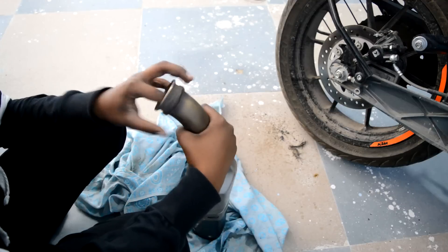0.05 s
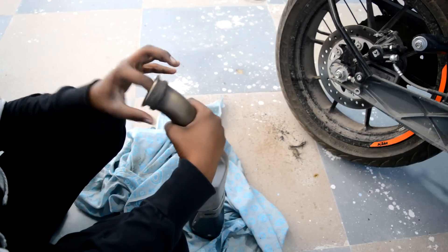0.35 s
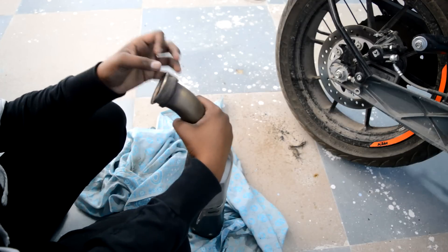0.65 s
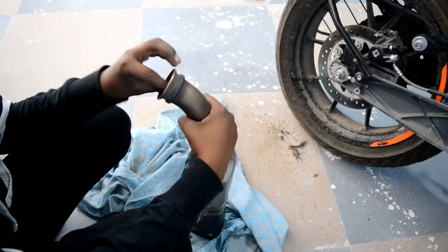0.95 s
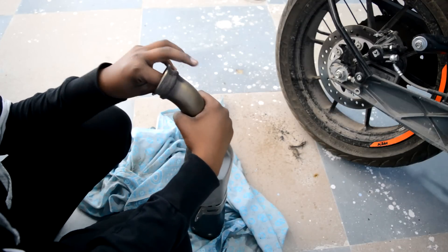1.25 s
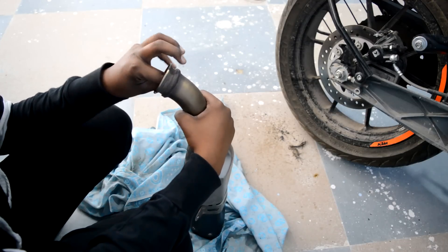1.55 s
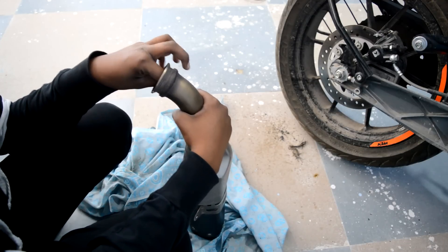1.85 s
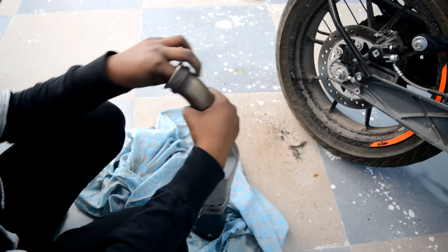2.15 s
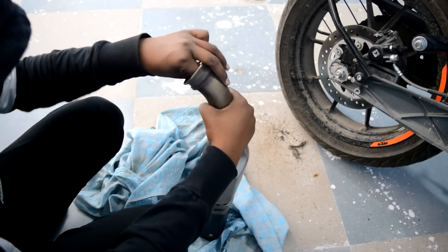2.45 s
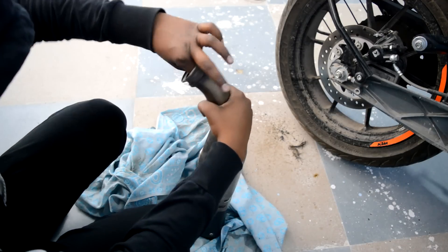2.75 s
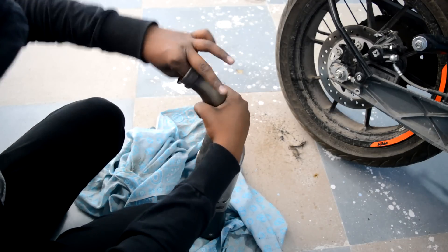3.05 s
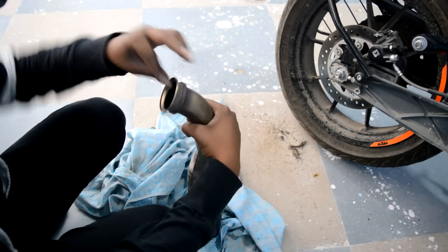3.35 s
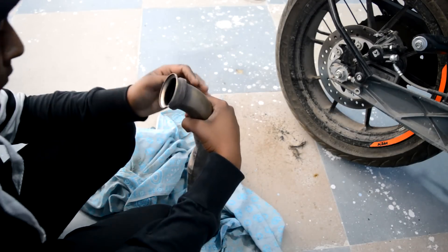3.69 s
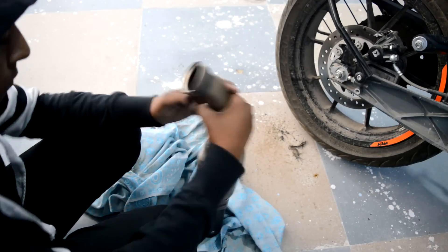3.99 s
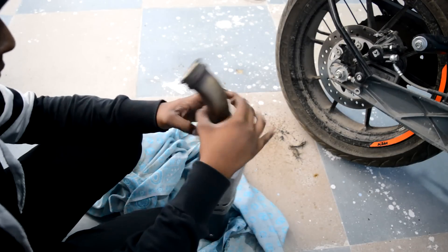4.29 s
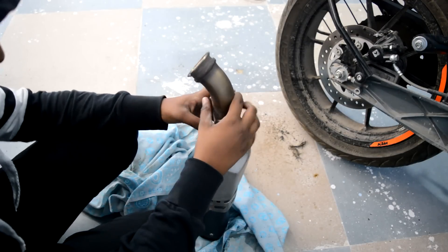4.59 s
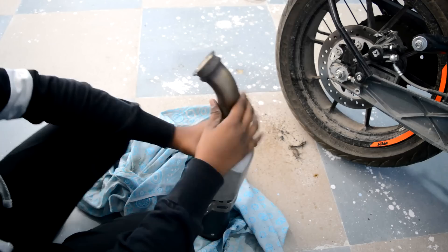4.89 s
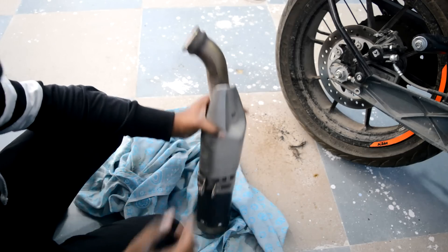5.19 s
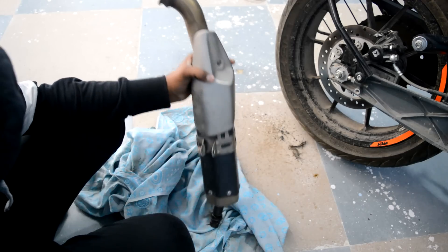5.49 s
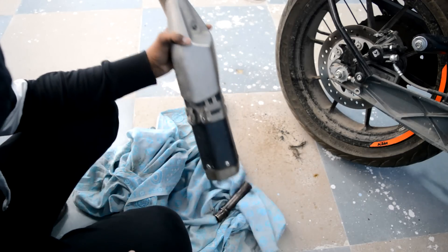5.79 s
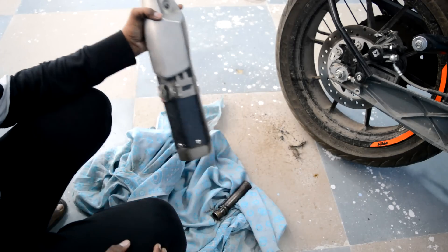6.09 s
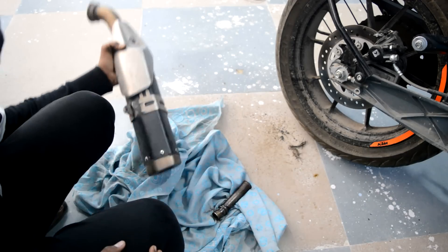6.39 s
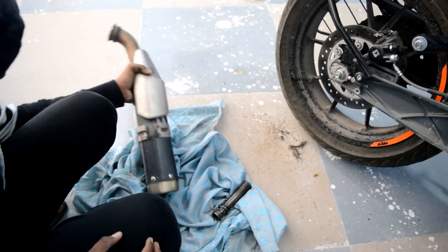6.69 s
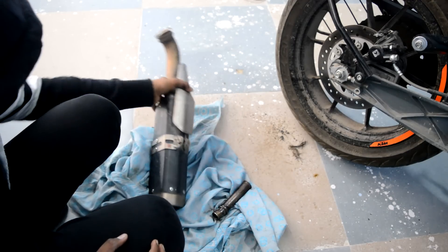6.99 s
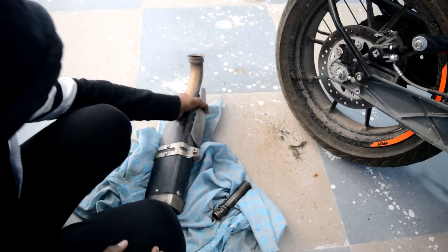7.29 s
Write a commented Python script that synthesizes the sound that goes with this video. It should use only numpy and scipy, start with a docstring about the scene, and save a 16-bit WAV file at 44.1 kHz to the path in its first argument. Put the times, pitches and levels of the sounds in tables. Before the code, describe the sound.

Metal scrapes and clanks in a shaken exhaust silencer until a loose tube drops, cracking and ringing on a tiled floor.

```python
"""A detached motorcycle silencer is handled in a hard, tiled, echoing space, over faint distant traffic.
A first shake makes the loose steel tube inside scrape and knock on the shell, and the hollow sings.
A finger pokes the tube for a few quiet, held taps. A hand brushes the can, and a second shake sets the
tube clanging. The silencer is lifted; the tube slides out of the end and hits the tiles with a crack
and a bright ring. Last, the silencer is set down on a cloth with a soft bump."""
import sys
import numpy as np
from scipy import signal
from scipy.fft import rfft, irfft, next_fast_len
from scipy.io import wavfile
from scipy.ndimage import map_coordinates

SR = 44100
rng = np.random.default_rng(int(sys.argv[2]) if len(sys.argv) > 2 else 0)


def unload_wav(signal):
    """Save mono or channel-first audio to the path in sys.argv[1] as 16-bit WAV at rate SR, clipped to [-1, 1]."""
    wavfile.write(
        sys.argv[1],
        SR,
        np.round(np.clip(np.atleast_2d(signal).T, -1, 1) * 32767).astype(np.int16),
    )


N = 332514

# The tube slides along the shell. Each row: start and length in seconds, rasp and singing levels in dB.
SLIDES = [(0, 0.27, -38.5, -61), (1.313, 0.11, -48.5, -43.5), (2.642, .01, -47, -62),
          (3.956, 0.077, -53, -78), (4.095, 0.11, -35, -66), (4.251, .14, -26.5, -45),
          (4.451, 0.066, -24, -31.5), (4.804, 0.07, -52, -57), (5.149, 0.084, -54.5, -58.5),
          (5.252, 0.09, -42.5, -36.5), (5.401, 0.017, -40.5, -47), (5.573, 0.15, -71, -46.5)]
# The tube swinging free. Each row: pitch in Hz, level in dB.
FREE_MODES = [(480, -14.5), (595, -10), (712, -1.5), (783, -6), (1092, -4), (1211, -5), (1292, 0.5),
              (1627, -9), (1753, 1.5), (1860, 1.5), (2057, -3.5), (2398, -2), (2607, 2), (2850, -9.5),
              (3082, -2), (3119, 0.5), (3323, 1), (3470, -9), (4240, -3), (4304, -1), (4900, -11.5),
              (5580, -9.5), (6040, -7), (6580, -0.5), (6680, -2), (6940, -0.5), (7600, -11.5), (9660, -13)]
# The tube held by a finger or leaning on the shell. Each row: pitch in Hz, level in dB.
HELD_MODES = [(715, -8.5), (1080, 1), (1275, -1), (1325, 4), (1825, -0.5), (2090, -2), (2200, -6.5),
              (2500, 1.5), (2660, -6.5), (2920, -0.5), (3160, -1), (4300, -1.5), (4830, -2), (5030, -4),
              (5860, -3), (6920, -13.5), (8030, -7.5)]
# Tone curve of the sheet metal. Each row: frequency in Hz, relative level per mode in dB.
SHEET_TONE = [(150, -18), (380, -23.5), (600, -7.5), (1500, -7), (3000, -6), (4200, -12), (5200, -12.5),
              (6800, -11.5), (8000, -19), (11500, -22.5), (16000, -38.5)]
# The hollow with the tube deep inside, and near the mouth. Each row: pitch in Hz, level in dB,
# 60 dB decay time in seconds.
HOLLOW_DEEP = [(770, -23, .05), (1177, -2.5, .06), (1227, 7, 0.13), (1750, -9.5, .06), (2360, -13.5, .06)]
HOLLOW_SHALLOW = [(1273, 1, 0.13), (1749, -8, .05), (2035, 0, 0.055), (2192, -5, 0.05)]
# Where the tube lies. Each row: time in seconds, position from 0 (deep) to 1 (near the mouth).
TUBE_POSITION = [(3.1, 0.89), (4.0, .03), (5.4, 0.12), (5.55, 0.88)]
# The grip of finger or shell on the tube. Each row: time in seconds, grip from 0 (free) to 1 (held).
GRIP = [(0.3, .18), (1.3, 0.48), (3.05, 0.82), (3.27, 0.29), (4.39, .1), (4.45, 0.77)]
# Tone curve of the traffic and hiss. Each row: frequency in Hz, relative level in dB.
AMBIENCE_TONE = [(18, -57), (30, -32.5), (48, -12), (81, -15), (103, -4.5), (189, -7), (273, -11),
                 (328, -11), (461, -14), (801, -16.5), (1760, -24.5), (1960, -21), (2680, -24.5),
                 (6210, -31.5), (16000, -45)]
# Their fader ride. Each row: time in seconds, level in dB.
AMBIENCE_RIDE = [(0, -54.5), (2.4, -54.5), (3.7, -58.5), (5, -54.5), (7.5, -59)]
# Reverb of the tiled space. Each row: frequency in Hz, level in dB, 60 dB decay time in seconds.
REVERB_BANDS = [(150, -8.5, 1.0), (493, -1.5, 1.15), (1000, -4.5, 1.22), (1970, -8, 1.3),
                (4170, -1.5, 0.84), (6650, -5, 0.78), (8550, -3.5, 0.23), (16000, -11, .32)]
# The tube hits the shell. Each row: start in seconds, level in dB, clang in dB, treble in dB.
KNOCKS = [(0.0335, -24, 9.5, 0), (0.078, -13.5, -6, -1.5), (0.1555, -13, -3, 2), (0.2128, -14.5, -6, -1.5),
          (0.2652, -18.5, 5.5, -3), (0.2755, -16, 7, -1.5), (1.27, -42.5, 0, -1), (1.345, -26.5, 12, 2.5),
          (1.864, -41.5, 10, 10), (1.881, -36, 4, 1.5), (1.969, -36.5, 4.5, -5), (2.564, -44.5, 8, 2),
          (2.6528, -22.5, 2, 1.5), (2.875, -35.5, 4, -7), (3.0525, -29.5, 4, 0), (3.2718, -26.5, -0.5, -2),
          (3.4205, -28, 7.5, -3), (4.0285, -17, 3, 4), (4.043, -22, -7.5, -1), (4.092, -17, 14, -4.5),
          (4.104, -19, 11.5, -7), (4.1945, -16, 4, 10.5), (4.209, -15, -6, -7), (4.2385, -15.5, 14, -4.5),
          (4.2765, -15, -1.5, -10), (4.301, -16, -1.5, 2), (4.378, -22.5, -9, -2.5), (4.45, -23, -2, 7),
          (4.493, -19, 8, 0), (4.537, -27, 16, 6), (4.9695, -43, 22, 1), (5.2005, -41.5, 10.5, 2),
          (5.242, -37.5, 7, -1), (5.377, -42, -10, 11), (5.415, -40.5, -18, 12), (5.493, -36, 6, 2),
          (5.514, -38, -4, 11), (5.528, -33, 4, 12), (5.545, -29.5, 16, 3.5), (5.613, -40.5, 1, 6)]
# A knock's EQ points in Hz: body, clang, neutral middle, treble, top edge.
KNOCK_EQ_HZ = [900, 1850, 3200, 6200, 10000]
# The tube runs into the end plate. Each row: start in seconds, level in dB.
END_STOPS = [(0.0785, -22.5), (0.213, -24.5), (4.494, -16)]
# Glancing blows on the tube. Each row: start in seconds, level in dB.
GLANCES = [(3.272, -55), (4.03, -26), (5.5455, -34.5)]
# The tube's high pings. Each row: pitch in Hz, level in dB, 60 dB decay time in seconds.
PING_MODES = [(5551, -3, .31), (5873, -9, .16), (6029, -13, .27), (6573, -11, .3), (6850, -7, .25),
              (6916, -3, .2), (9582, -19, .14), (12060, -33, .15), (12750, -31, .08)]
# Hand and sleeve strokes. Each row: midpoint in seconds, length in seconds, level in dB.
BRUSHES = [(3.992, 0.16, -53.5), (4.85, 0.19, -55.5), (6.2, 0.35, -63.5), (7.05, 0.5, -69.5)]
# End-on blows on the tube. Each row: start in seconds, level in dB.
END_ON_HITS = [(4.1955, -28.5), (4.2768, -19.5), (4.3015, -20)]
# The ring they wake. Each row: pitch in Hz, level in dB, 60 dB decay time in seconds.
END_ON_MODES = [(2705, -4.5, 0.17), (3119, -8, 0.97), (3280, -9.5, 0.079), (6590, -0.5, 0.16)]
# The silencer meets the cloth. Each row: start in seconds, level in dB.
BUMP_HITS = [(6.8155, -37.5)]
# Its muffled thud. Each row: pitch in Hz, level in dB, 60 dB decay time in seconds.
BUMP_MODES = [(176, 6, 0.077), (259.4, -6, 0.024), (775, -27, 0.043)]

RING_S, ATTACK_S = .25, .012  # length of a knock's ring, and of the attack that sets its level
DROP_S = 5.8543  # the tube lands on the tiles


def from_db(db):
    """Decibels to gain."""
    return 10 ** (np.asarray(db) / 20)


def rms(x):
    """Average signal level, as root mean square."""
    return np.sqrt(np.mean(x ** 2) + 1e-20)


def seconds(length):
    """Time axis of a given length."""
    return np.arange(int(length * SR)) / SR


def at_time(points, s):
    """Read an automation curve at a time."""
    return np.interp(s, *np.transpose(points))


def at_hz(points, hz, column=1):
    """Read a column of a table on a log-frequency axis."""
    table = np.array(points)
    return np.interp(np.log(np.maximum(hz, 1)), np.log(table[:, 0]), table[:, column])


def add(track, s, sound):
    """Mix a sound into a track at a time."""
    start = round(s * SR)
    track[start:start + len(sound)] += sound[:N - start]


def high_pass(x, cut_hz):
    """Low cut: a small body hardly radiates below its lowest modes."""
    return signal.sosfilt(signal.butter(2, cut_hz, "high", fs=SR, output="sos"), x)


def band_pass(x, low_hz, high_hz, order):
    """Keep one band of a sound."""
    return signal.sosfilt(signal.butter(order, [low_hz, high_hz], "band", fs=SR, output="sos"), x)


def rings(modes, length):
    """One decaying sine for each mode (Hz, dB, t60), as rows."""
    hz, db, t60 = np.array(modes, float).T[:, :, None]
    t = seconds(length)
    return np.sin(2 * np.pi * hz * t) * from_db(db) * np.exp(-np.log(1000) * t / t60)


def struck(hits, modes):
    """Clean blows on one set of modes."""
    out, ring = np.zeros(N), rings(modes, length=0.98).sum(axis=0)
    for s, db in hits:
        add(out, s, from_db(db) * ring)
    return out


def metal_modes(tube_t60, sheet_db, sheet_t60, count=360):
    """Modes of the free tube, of the held tube, and a crowd of short-lived ones in the sheet metal."""
    tube = [(hz, db, tube_t60) for hz, db in FREE_MODES + HELD_MODES]
    hz = np.linspace(150, 15800, count) + rng.uniform(-20, 20, count)
    sheet = np.column_stack([hz, at_hz(SHEET_TONE, hz) + sheet_db, np.full(count, sheet_t60)])
    return np.vstack([tube, sheet])


def mode_shares(grip, count):
    """Grip crossfades free modes into held ones; the sheet metal always rings. Polarity is random."""
    shares, free = np.ones(count), len(FREE_MODES)
    shares[:free] = 1 - grip
    shares[free:free + len(HELD_MODES)] = grip
    return shares * rng.choice([-1, 1], count)


def slide_envelope(slides, fall_db_per_s, rise_db_per_s=698.5, sag_db_per_s=13):
    """Each slide swells quickly, sags as it loses speed, then dies away."""
    t, gain = np.arange(N) / SR, np.zeros(N)
    for start, length, db in slides:
        rise = rise_db_per_s * np.maximum(start - t, 0)
        sag = sag_db_per_s * np.clip(t - start, 0, length)
        fall = fall_db_per_s * np.maximum(t - start - length, 0)
        gain = np.maximum(gain, from_db(np.maximum(db - rise - sag - fall, -200)))
    return gain


def scrape(ring, slips_per_s, spread_db, wander_s=.0005, moves_per_s=16):
    """Stick-slip clicks set a body ringing; its pitches waver as the point of contact moves."""
    sizes = from_db(spread_db * np.minimum(rng.exponential(1, N), 4))
    slips = (rng.random(N) < slips_per_s / SR) * sizes * rng.choice([-1, 1], N)
    sound = high_pass(signal.fftconvolve(slips, ring)[:N], cut_hz=480)
    steps, path = np.arange(N), rng.standard_normal(400)
    lag = wander_s * SR * np.interp(steps / SR * moves_per_s, np.arange(len(path)), path)
    sound = map_coordinates(sound, [steps + lag], order=3)
    return sound / rms(sound)


def rasp(metal):
    """Steel drags on steel: dense friction wakes tube and shell together."""
    envelope = slide_envelope([(s, length, db) for s, length, db, _ in SLIDES], fall_db_per_s=279.5)
    ring = mode_shares(grip=0.22, count=len(metal)) @ metal
    return envelope * scrape(ring, slips_per_s=760, spread_db=6)


def hollow_singing(kick_db=-12, clang_follow=0.69):
    """Slides and knocks set the air in the pipe singing; the pitches depend on where the tube lies."""
    envelope = slide_envelope([(s, length, db) for s, length, _, db in SLIDES], fall_db_per_s=98)
    position = at_time(TUBE_POSITION, np.arange(N) / SR)
    out = np.zeros(N)
    for modes, share in ((HOLLOW_DEEP, 1 - position), (HOLLOW_SHALLOW, position)):
        ring = rings(modes, RING_S).sum(axis=0)
        sound = envelope * scrape(ring, slips_per_s=200, spread_db=5)
        # a knock on the held tube kicks the hollow, more so when it clangs
        kick = high_pass(ring, cut_hz=550) / rms(ring[:int(ATTACK_S * SR)])
        for s, level_db, clang, _ in KNOCKS:
            add(sound, s, at_time(GRIP, s) * from_db(level_db + kick_db + clang_follow * clang) * kick)
        out += np.sqrt(share) * sound
    return out


def ambience():
    """A low bed of distant traffic under faint hiss."""
    size = next_fast_len(N)
    white = rfft(rng.standard_normal(size))
    tone = from_db(at_hz(AMBIENCE_TONE, np.arange(len(white)) * SR / size))
    noise = irfft(white * tone, size)[:N]
    return from_db(at_time(AMBIENCE_RIDE, np.arange(N) / SR)) * noise / rms(noise)


def tiled_reverb(x, predelay_s, build_s):
    """Diffuse echo of hard walls: half-octave bands of noise, the treble dying first."""
    t, edges_hz = seconds(1.5), np.geomspace(90, 16500, 16)
    onset = np.clip((t - predelay_s) / build_s, 0, 1)
    tail = np.zeros(len(t))
    for low, high in zip(edges_hz, edges_hz[1:]):
        hz = np.sqrt(low * high)
        band = band_pass(rng.standard_normal(len(t)), low, high, order=2)
        band *= onset * np.exp(-np.log(1000) * t / at_hz(REVERB_BANDS, hz, column=2))
        unity_gain = np.sqrt(2 * (high - low) / SR / np.sum(band ** 2))
        tail += band * unity_gain * from_db(at_hz(REVERB_BANDS, hz))
    return signal.fftconvolve(x, tail)[:N]


def clatter(bounces_per_s, offset_db, spread_db, treble_db):
    """The sliding tube bounces at random, just under its rasp; gives extra rows of knocks."""
    rows = []
    for start, length, rasp_db, _ in SLIDES:
        delays = np.cumsum(rng.exponential(1 / bounces_per_s, size=12))
        accents, clangs = spread_db * rng.uniform(-2, 2, size=(2, 12))
        rows += [(start + s, rasp_db + offset_db + accent, clang, treble_db)
                 for s, accent, clang in zip(delays, accents, clangs) if s < length]
    return rows


def contact(chatter, chatter_s, rebounds_per_s=900):
    """One touch, followed for a few milliseconds by tiny rebounds."""
    t = seconds(ATTACK_S * 2)
    rebounds = (rng.random(len(t)) < rebounds_per_s / SR) * rng.standard_normal(len(t))
    force = chatter * rebounds * np.exp(-t / chatter_s)
    force[0] = 1
    return force


def knock_eq(hz, level_db, clang, treble, medium_db=-28.5, range_db=14):
    """One knock's colour in dB: softer knocks are duller, and the top edge follows the treble."""
    body = 1.5 + 0.4249 * (medium_db - level_db)
    edge = -2 + 0.93 * treble
    eq_db = np.clip([body, clang, 0, treble, edge], -range_db, range_db)
    return np.interp(np.log(hz), np.log(KNOCK_EQ_HZ), eq_db)


def knocks(blows, hz, metal, spread_db, detune, rise_s):
    """Each knock lands on another spot, so it weights and detunes the modes in its own way."""
    out, steps = np.zeros(N), np.arange(metal.shape[1])
    onset = 1 - np.exp(-steps / SR / rise_s)  # the blow takes a moment to spread through the shell
    for s, level_db, clang, treble in blows:
        colour_db = knock_eq(hz, level_db, clang, treble) + spread_db * rng.standard_normal(len(hz))
        weights = from_db(colour_db) * mode_shares(at_time(GRIP, s), len(hz))
        speed = 1 + detune * rng.uniform(-1, 1)
        clank = map_coordinates(weights @ metal, [steps * speed], order=3)
        clank = signal.fftconvolve(clank, contact(chatter=0.27, chatter_s=0.006))[:len(steps)]
        clank = high_pass(clank * onset, cut_hz=300)
        add(out, s, from_db(level_db) * clank / rms(clank[:int(ATTACK_S * SR)]))
    return out


def end_plate_clunks(t60):
    """The tube hits the end plate: a blunt clunk that reaches only the four lowest modes."""
    return high_pass(struck(END_STOPS, [(hz, db, t60) for hz, db in FREE_MODES[:4]]), cut_hz=400)


def tube_pings(drop_db):
    """Glancing blows wake only the tube's lowest ping; the drop onto the tiles wakes them all."""
    glances = struck(GLANCES, PING_MODES[:1])
    drop = struck([(DROP_S, drop_db)], PING_MODES)
    return high_pass(glances + drop, cut_hz=1100)


def brushing(low_hz, high_hz):
    """Hand and sleeve brush over the can and the cloth in soft swells of bright hiss."""
    hiss = band_pass(rng.standard_normal(N), low_hz, high_hz, order=1)
    swells = np.zeros(N)
    for s, length, db in BRUSHES:
        add(swells, s - length / 2, from_db(db) * np.hanning(int(length * SR)))
    return swells * hiss / rms(hiss)


def tube_ring():
    """End-on blows set the tube itself ringing, with one note that hangs on."""
    return high_pass(struck(END_ON_HITS, END_ON_MODES), cut_hz=1200)


def tile_crack(peak_db, low_hz, high_hz):
    """Steel meeting tile sends out one very short pressure pulse."""
    out = np.zeros(N)
    pulse = band_pass(seconds(ATTACK_S) == 0, low_hz, high_hz, order=3)
    add(out, DROP_S, from_db(peak_db) * pulse / np.abs(pulse).max())
    return out


def cloth_bump():
    """The silencer settles on the cloth with a low, quickly damped thud."""
    return high_pass(struck(BUMP_HITS, BUMP_MODES), cut_hz=190)


def scene():
    """Silencer, tube and room in mono, heard from above at arm's length."""
    modes = metal_modes(tube_t60=.115, sheet_db=3.5, sheet_t60=0.043)
    metal = rings(modes, RING_S)
    blows = list(KNOCKS) + clatter(bounces_per_s=30, offset_db=-4, spread_db=1, treble_db=4.5)
    rattle = knocks(blows, modes[:, 0], metal, spread_db=2.5, detune=.012, rise_s=0.0018)
    handling = rasp(metal) + hollow_singing() + rattle + end_plate_clunks(t60=0.047)
    handling += brushing(low_hz=4500, high_hz=11000) + tube_ring() + cloth_bump()
    pings = tube_pings(drop_db=-18.5)
    crack = tile_crack(peak_db=-1.5, low_hz=1000, high_hz=3900)
    # the fallen tube rings mostly upwards, so less of it reaches the walls
    send = handling + from_db(-3.5) * pings + from_db(-2.5) * crack
    reverb = tiled_reverb(send, predelay_s=0.002, build_s=0.0026)
    return (handling + pings + crack + reverb + ambience())[None]


def record(dry):
    """Soft clipping rounds the loudest peaks, and a steep filter cuts the very top."""
    ceiling, stopband_hz = 0.79, 16700
    rounded = ceiling * np.tanh(dry / ceiling)
    return signal.sosfilt(signal.cheby2(14, 70, stopband_hz, fs=SR, output="sos"), rounded)


dry = scene()
out = record(dry)
unload_wav(out)
```